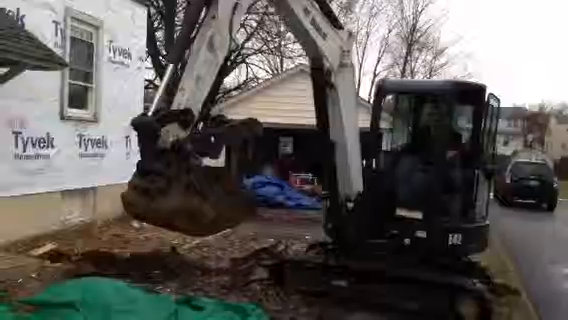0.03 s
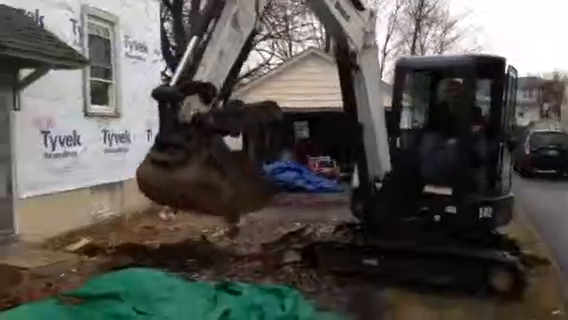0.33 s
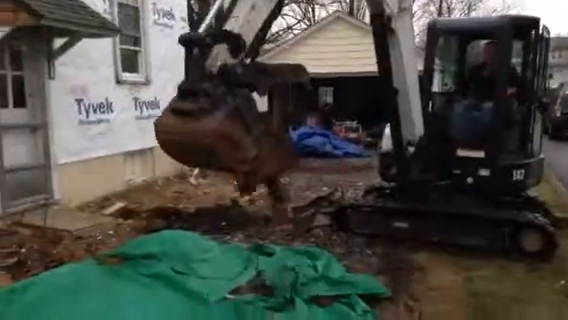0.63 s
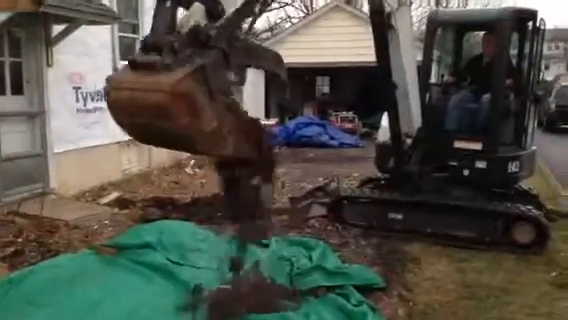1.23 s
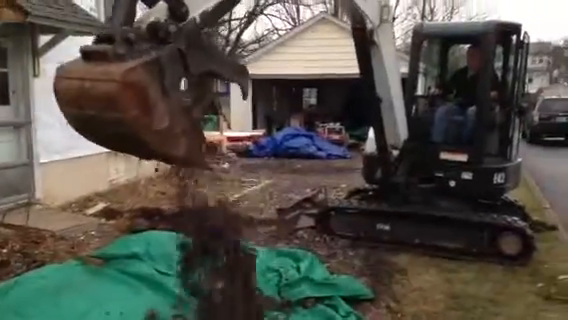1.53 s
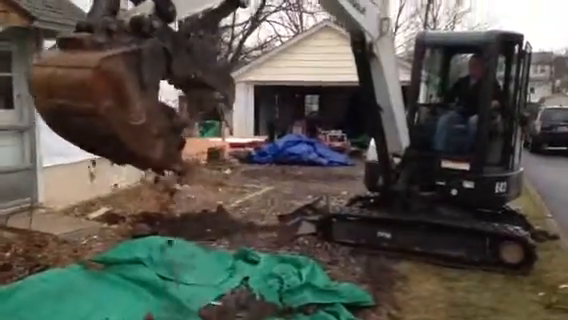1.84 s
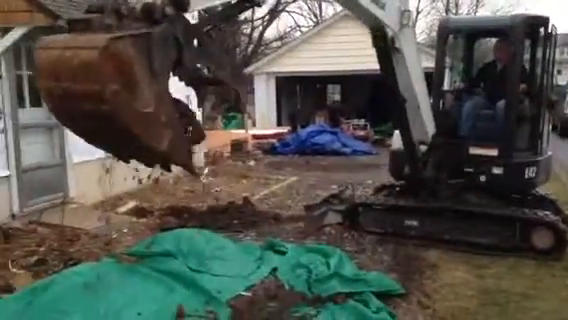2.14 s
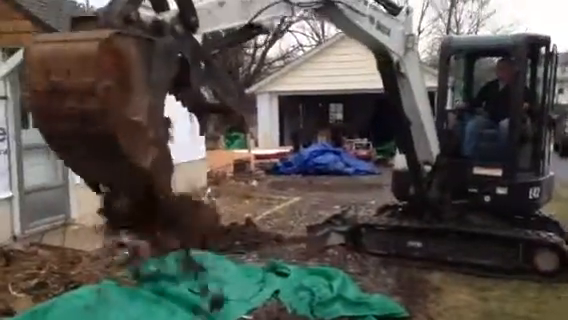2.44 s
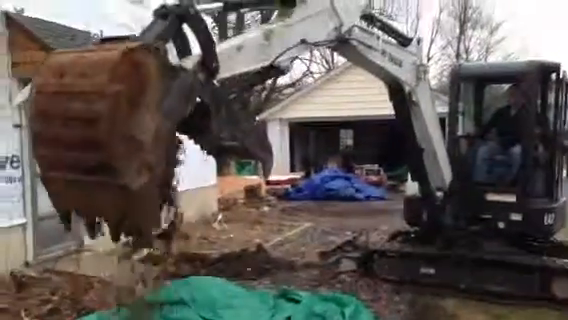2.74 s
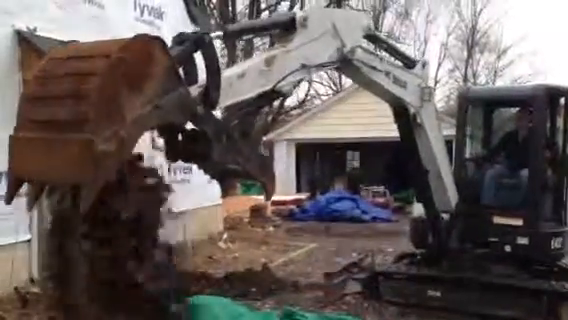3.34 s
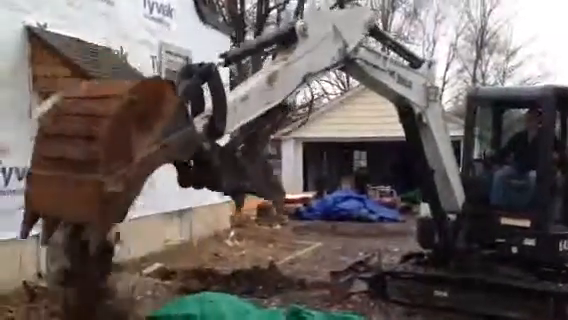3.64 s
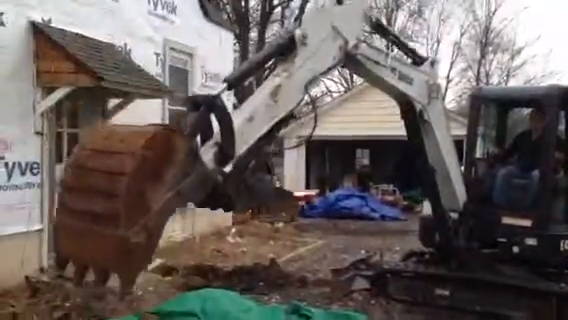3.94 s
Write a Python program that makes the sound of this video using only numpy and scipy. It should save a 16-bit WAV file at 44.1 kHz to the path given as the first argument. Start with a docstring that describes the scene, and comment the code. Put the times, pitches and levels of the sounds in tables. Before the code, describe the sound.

Soil falls in uneven waves onto a tarp and the ground, with clods thudding, stones knocking and plastic snapping. An excavator's diesel engine drones before and throughout the pour, heard in mono outdoors with a faint, short echo.

```python
"""A low diesel drone runs under surges of pattering soil, with thuds, knocks and sharp plastic snaps. A small
excavator is tipping a bucket of damp soil onto a tarp and the ground beside a house. Periodic firing makes the
exhaust tones, which sag in pitch under load. The soil is a sum of many tiny damped impacts; clods thud and
crumble, stones knock, and sharp snaps ring out as the tarp is struck or hard lumps crack. Reflections in the
yard add a faint, short tail, and one mono microphone picks it all up."""
import sys
import numpy as np
from scipy import signal
from scipy.fft import rfft, irfft
from scipy.io import wavfile

SR = 44100
rng = np.random.default_rng(int(sys.argv[2]) if len(sys.argv) > 2 else 0)


def store_pcm(level_fs):
    """Save levels as 16-bit WAV."""
    pcm = np.round(np.clip(level_fs, -1, 1) * 32767).astype(np.int16)
    wavfile.write(sys.argv[1], SR, np.atleast_2d(pcm).T)


N = 176400
T = np.arange(N) / SR


def amp(db):
    """Amplitude ratio of a level in decibels."""
    return 10 ** (np.asarray(db) / 20)


def unit(x):
    """Normalisation to an rms of 1."""
    return x / np.sqrt(np.mean(x ** 2) + 1e-20)


def curve(table, column=1):
    """Linear interpolation of one table column over time."""
    rows = np.array(table)
    return np.interp(T, rows[:, 0], rows[:, column])


def add(mix, start_s, sound):
    """Superposition: a sound joins the mix at its start time."""
    part = mix[round(start_s * SR):][:len(sound)]
    part += sound[:len(part)]


def drift(rate_hz):
    """Slow random fluctuation: low-passed noise of rms 1."""
    hz = np.fft.rfftfreq(N, 1 / SR)
    return unit(irfft(rfft(rng.standard_normal(N)) / (1 + (hz / rate_hz) ** 4), N))


def colour(x, spectrum, size=4096):
    """Minimum-phase filtering to a spectral shape, with unit power gain for white noise."""
    hz, db = np.transpose(spectrum)
    log_hz = np.log(np.fft.rfftfreq(size, 1 / SR) + 1)
    log_gain = np.log(amp(np.interp(log_hz, np.log(hz), db)))
    cepstrum = irfft(log_gain)[:size // 2]
    cepstrum[1:] *= 2
    taps = irfft(np.exp(rfft(cepstrum, size)))
    return signal.oaconvolve(x, taps / np.linalg.norm(taps))[:len(x)]


def knock(hz, decay_cycles, size=3000):
    """Heavily damped oscillation that builds quickly and dies, with a peak of 1."""
    cycles = hz * np.arange(size) / SR
    wave = cycles * np.exp(-cycles / decay_cycles) * np.sin(2 * np.pi * cycles)
    return wave / abs(wave).max()


def burst(decay_s, spread_db, size=4000):
    """Exponentially decaying noise, made grainy by a random gain on each sample."""
    t = np.arange(size) / SR
    grains = unit(rng.standard_normal(size) * amp(spread_db * rng.standard_normal(size)))
    return grains * (1 - np.exp(-t / 0.00046)) * np.exp(-t / decay_s)


def patter(per_s, spread_db, low_hz, high_hz, decay_cycles, pitches=9):
    """Shot noise: tiny knocks of random size and pitch arrive independently; rms 1."""
    hits = (rng.random(N) < per_s / SR) * rng.choice([-1, 1], N)
    hits = hits * amp(spread_db * np.minimum(rng.exponential(1, N), 3.2))
    pitch_index, out = rng.integers(0, pitches, N), np.zeros(N)
    for k, hz in enumerate(np.geomspace(low_hz, high_hz, pitches)):
        grain = knock(hz, decay_cycles)
        out += signal.oaconvolve(hits * (pitch_index == k), grain / abs(rfft(grain)).max())[:N]
    return unit(out)


def yard(x, tail_db=-15.5, t60_s=0.24, reflections_per_s=2000, size=12000):
    """Reverberation: sparse, decaying reflections follow the direct sound."""
    t = np.arange(size) / SR
    taps = rng.standard_normal(size) * (rng.random(size) < reflections_per_s / SR)
    taps *= (t > 0.004) * amp(-60 * t / t60_s)
    taps *= amp(tail_db) / np.linalg.norm(taps)
    taps[0] = 1  # direct path
    return signal.oaconvolve(x, taps)[:N]


def hollow(x, width_hz=290):
    """Notch filtering: subtracting a narrow band leaves a drifting hollow in the upper mids."""
    # path of the notch: time_s, centre_hz, depth_fraction
    notch = [(.6, 2900, 0.7), (1.1, 3010, 0.9), (1.85, 2850, 0.4), (2.5, 2601, 0.25), (3.2, 2684, 0.68)]
    carrier = np.exp(2j * np.pi * np.cumsum(curve(notch)) / SR)
    pole = np.exp(-np.pi * width_hz / SR)
    band = 2 * (carrier * signal.lfilter([1 - pole], [1, -pole], x / carrier)).real
    return x - curve(notch, column=2) * band


def engine(shaft_db=-42.5, speed_db_per_hz=0.57):
    """Periodic firing gives exhaust tones at harmonics of the shaft rate and modulates the clatter."""
    # exhaust drone: time_s, firing_hz, firing_tone_db, uneven_firing_tone_db
    drone = [(0.14, 84.1, -29.5, -36.5), (0.33, 85.8, -28.5, -68), (0.5, 79.5, -31, -37.5),
             (0.65, 83.8, -33.5, -37), (1.0, 81, -30, -40), (1.65, 79.9, -29.5, -37), (2.2, 77.9, -25, -50),
             (2.6, 78.5, -30, -54), (2.68, 79.35, -28.5, -41.5), (2.9, 79.4, -30, -34.5),
             (3.17, 79.7, -29.5, -52), (3.5, 85.46, -32.5, -41), (3.82, 89.15, -30, -60),
             (3.88, 89, -36, -56), (3.96, 83.2, -34.5, -62)]
    # brief dips and bends of the firing tone: centre_s, half_width_s, gain_db, sag_hz
    dips = [(2.728, 0.025, 0, 28), (2.931, 0.011, -18, -2.5), (3.421, .015, -7, 3)]
    # upper exhaust tones: firing_rate_multiple, level_db
    orders = [(2, -54.5), (2.5, -56.5), (3, -64)]
    # spectrum of the clatter and fan: frequency_hz, relative_db
    clatter_spectrum = [(20, -17), (50, 0.5), (100, 4), (200, -5.5), (340, -2.5), (480, -8), (680, -10.5),
                        (900, -8), (1300, -14), (2000, -14), (2550, -17), (3200, -18), (5000, -23.5),
                        (8000, -31), (15000, -38.5)]
    # envelope of the clatter: time_s, level_db
    clatter_levels = [(.12, -36), (.28, -37), (.42, -41), (.5, -38.5), (2.2, -36), (3.8, -41), (3.9, -51)]
    firing_hz = curve(drone) * (1 + 0.0044 * drift(8.3))
    phase = 2 * np.pi * np.cumsum(firing_hz) / SR
    dip_db, sag_hz = sum(np.outer(depths, np.exp(-((T - centre_s) / half_width_s) ** 2))
                         for centre_s, half_width_s, *depths in dips)
    phase_lag = 2 * np.pi * np.cumsum(sag_hz) / SR
    tones = amp(curve(drone, column=2) + dip_db) * np.sin(phase - phase_lag)
    tones += amp(curve(drone, column=3)) * np.sin(1.5 * phase)  # uneven firing
    tones += amp(shaft_db + 0.6 * drift(5)) * np.sin(phase / 2)  # once per shaft turn
    speed_db = speed_db_per_hz * (firing_hz - firing_hz.mean())  # upper tones fade as the engine slows
    for multiple, level_db in orders:
        gain = amp(level_db + speed_db + 7 * drift(3.6))
        tones += gain * np.sin(multiple * phase + 2 * np.pi * rng.random())
    throb = amp(1.2 * np.cos(phase) + 1.1 * np.cos(phase / 2))
    clatter = colour(throb * rng.standard_normal(N), clatter_spectrum)
    return np.sqrt(2) * tones + amp(curve(clatter_levels)) * clatter


def cracks():
    """Impulsive excitation: short broadband snaps ring out, from the plastic sheet struck on a fold or from
    hard lumps cracking."""
    # sharp snaps: start_s, level_db
    snaps = [(.557, -37), (0.697, -19), (.739, -27.5), (.835, -29), (1.194, -18), (1.233, -14),
             (1.484, -14), (1.733, -19), (1.827, -15), (2.152, -20.5), (2.196, -20.5), (2.312, -15),
             (2.452, -21), (2.531, -19), (2.7293, -17), (2.74, -24), (2.772, -20), (2.806, -15),
             (2.836, -19), (2.957, -17), (3.347, -9)]
    # spectrum of a snap: frequency_hz, relative_db
    snap_spectrum = [(300, -19), (1500, -6), (3500, -2.5), (7000, -6), (15000, -17)]
    out = np.zeros(N)
    for start_s, level_db in snaps:
        add(out, start_s, amp(level_db) * burst(decay_s=0.0023, spread_db=2.5))
    return colour(out, snap_spectrum)


def stones(scuff_db=-7):
    """Damped impact and friction: each stone knocks once and scuffs the ground at the same pitch."""
    # stone landings: start_s, peak_db, pitch_hz
    landings = [(1.3, -10, 1986), (1.3293, -6.5, 1740), (1.6393, -7, 2250), (1.7972, -3.5, 2430),
                (2.3995, -11, 1290), (2.4305, -14, 1709), (2.453, -19, 1690), (2.7315, -4, 3300),
                (2.8054, -8, 2600), (2.9607, -8, 1970), (3.6374, -4.5, 1510), (3.842, -5.5, 4300)]
    out = np.zeros(N)
    for start_s, peak_db, pitch_hz in landings:
        hit = knock(pitch_hz, decay_cycles=0.355)
        scuff = signal.fftconvolve(burst(decay_s=0.0029, spread_db=9.5), hit / np.linalg.norm(hit))
        add(out, start_s, amp(peak_db) * hit)
        add(out, start_s, amp(peak_db + scuff_db) * scuff)
    return out


def clods(slump_db=-13, slump_cycles=4.6):
    """Inelastic impact: each clod thuds on the ground, slumps and fractures into crumbs."""
    # clod landings: start_s, thud_db, pitch_hz, crumble_db
    landings = [(1.04, -15.5, 286.4, -28), (1.094, -23, 330, -29), (1.2341, -11.5, 265, -38),
                (1.247, -26, 250, -39), (1.323, -38, 472, -17), (1.561, -49, 406.4, -16),
                (1.826, -22, 171, -18), (2.288, -36, 450, -22), (2.377, -42, 480, -25),
                (2.398, -39, 595, -21.5), (2.663, -22.5, 419, -37), (2.673, -51, 200.7, -21),
                (2.77, -42, 403, -16.5), (2.855, -18, 151, -13.5), (2.863, -12, 486, -11),
                (2.896, -22, 258, -20), (3.2629, -18, 380, -12.5), (3.285, -25, 392, -16.5),
                (3.3252, -10.5, 163, -13), (3.349, -41, 168, -20.5), (3.377, -29, 130.9, -20.5),
                (3.62, -44, 300, -35)]
    # spectrum of a clod breaking up: frequency_hz, relative_db
    crunch_spectrum = [(150, -6.5), (500, -1.5), (950, -2.5), (1400, -6), (2100, 4.5), (4000, -4.5),
                       (7000, -20.5), (15000, -30)]
    thuds, crumbs = np.zeros(N), np.zeros(N)
    for start_s, thud_db, pitch_hz, crumble_db in landings:
        soft_knock = knock(pitch_hz, decay_cycles=0.32)
        collapse = burst(decay_s=slump_cycles / pitch_hz, spread_db=-3.5)  # longer for a deeper thud
        slump = signal.fftconvolve(collapse, soft_knock / np.linalg.norm(soft_knock))
        add(thuds, start_s, amp(thud_db) * knock(pitch_hz, decay_cycles=0.45))
        add(thuds, start_s, amp(thud_db + slump_db) * slump)
        add(crumbs, start_s, amp(crumble_db) * burst(decay_s=0.011, spread_db=3.5))
    return thuds + colour(crumbs, crunch_spectrum)


def crackle(per_s=90):
    """An irregular impulse train: sharp grains strike the tarp one by one."""
    # spectrum of one grain on the tarp: frequency_hz, relative_db
    grain_spectrum = [(400, -23), (1200, 0), (2300, 2.5), (4500, -3), (7000, -7.5), (15000, -23)]
    gaps_s = rng.uniform(0.2, 1.8, int(2 * per_s * N / SR)) / per_s
    onsets = (np.cumsum(gaps_s) * SR).astype(int)
    onsets = onsets[onsets < N]
    hits = np.zeros(N)
    hits[onsets] = rng.choice([-1, 1], len(onsets)) * amp(rng.uniform(-12, 0, len(onsets)))
    return unit(colour(hits, grain_spectrum))


def soil(pebble_db=-15, dust_db=-2.5, crackle_db=-2, rise_s=0.051):
    """Granular impact noise: countless landings add in power, and finer grains sound higher."""
    # surges of the pour, before each size's offset: time_s, crumbs_db, grit_db, lumps_db
    pour = [(0.55, -74, -56, -39), (0.66, -39, -50, -42), (0.71, -72, -40.5, -35), (0.76, -43, -38, -34),
            (0.8, -43.5, -43, -38.5), (0.93, -38.5, -46, -54), (1.0, -23.5, -31.5, -30.5),
            (1.05, -25, -27.5, -24), (1.16, -30.5, -30.5, -31), (1.22, -26.5, -31, -35),
            (1.26, -31, -33.5, -25.5), (1.31, -24, -30.5, -29.5), (1.36, -24.5, -33.5, -31),
            (1.44, -28, -37, -35.5), (1.5, -22.5, -30, -31), (1.58, -23, -28.5, -36.5),
            (1.7, -27, -28, -36), (1.75, -22, -26, -32.5), (1.82, -26, -26.5, -29.5),
            (1.88, -27, -29.5, -36.1), (1.99, -32.5, -38.5, -36), (2.1, -31.5, -42, -40.5),
            (2.17, -30, -34.5, -39), (2.24, -30.5, -37, -40), (2.3, -25, -32.5, -33),
            (2.36, -26.5, -42, -39), (2.42, -27.5, -38, -39), (2.44, -23, -38, -39), (2.5, -27, -36, -33.5),
            (2.56, -29, -36.5, -41), (2.64, -26, -41, -47), (2.71, -26.5, -38, -50), (2.735, -22, -26, -57),
            (2.76, -22.5, -36, -50), (2.8, -19.5, -27.5, -34), (2.85, -15.5, -21.5, -23),
            (2.89, -22.5, -29, -28.5), (2.96, -25.5, -31.5, -38), (3.08, -30.5, -37.5, -40),
            (3.14, -31.5, -35, -42), (3.21, -30, -28, -32), (3.25, -27, -36, -55), (3.31, -26.5, -29, -49),
            (3.36, -29, -25, -51), (3.41, -41, -38.5, -46), (3.46, -35, -34, -40), (3.52, -41, -44.5, -44),
            (3.58, -33, -39.5, -38.5), (3.63, -32, -31, -27), (3.69, -33, -38, -33.5),
            (3.76, -31, -32.5, -33), (3.83, -32, -32, -35), (3.87, -37.5, -48, -53),
            (3.99, -42.5, -48, -46)]
    # share of the soil that lands on the tarp: time_s, share_fraction
    tarp_shares = [(1.0, 0.6), (1.35, 0.84), (1.6, 0.72), (1.85, 0.57), (2.1, 0.34), (2.6, 0.14),
                   (2.85, 0.3), (3.1, 0.06), (3.8, 0.33)]
    # spectrum of crumbs on the ground: frequency_hz, relative_db
    crumb_spectrum = [(200, -27), (550, -6.5), (950, -4.5), (1500, 5.5), (2100, 4), (3000, -2.5),
                      (3900, -10), (4600, -11.5), (7000, -13), (15000, -32)]
    # spectrum of crumbs on the tarp: frequency_hz, relative_db
    rattle_spectrum = [(200, -28.5), (700, -8.5), (1150, 5), (1650, -2.5), (2300, 2.5), (3100, -1),
                       (4000, -3), (4600, -13), (7000, -17), (15000, -55)]
    # spectrum of grit: frequency_hz, relative_db
    grit_spectrum = [(500, -10), (2000, 10.5), (3500, 6), (5000, 3), (7000, -5.5), (10000, -6),
                     (15000, -12)]
    # hiss of the finest soil: frequency_hz, relative_db
    dust_spectrum = [(1000, -5), (4000, 5), (8000, 0.5), (11000, -3.5), (15000, -7)]
    # spectrum of soft lumps: frequency_hz, relative_db
    lump_spectrum = [(40, 5.5), (110, -4.5), (200, -3), (350, -1.5), (600, -4), (1000, -11), (2500, -17.5)]
    clumping, share = drift(28), curve(tarp_shares)

    ground_hits = patter(per_s=2600, spread_db=0.5, low_hz=609, high_hz=9100, decay_cycles=0.66)
    tarp_hits = patter(per_s=2200, spread_db=-2.5, low_hz=617, high_hz=8800, decay_cycles=0.4)
    pebbles = patter(per_s=70, spread_db=3, low_hz=1480, high_hz=4060, decay_cycles=0.45)
    crumbs = np.sqrt(1 - share) * unit(colour(ground_hits, crumb_spectrum))
    crumbs += np.sqrt(share) * unit(colour(tarp_hits, rattle_spectrum))
    crumbs += amp(pebble_db) * pebbles

    grit_hits = patter(per_s=6000, spread_db=6, low_hz=1480, high_hz=14500, decay_cycles=0.38)
    grit = unit(colour(grit_hits, grit_spectrum))
    grit += amp(dust_db) * colour(rng.standard_normal(N), dust_spectrum)
    grit += amp(crackle_db) * np.sqrt(share) * crackle()

    lump_hits = patter(per_s=700, spread_db=0, low_hz=92.6, high_hz=1220, decay_cycles=0.51)
    lumps = unit(colour(lump_hits, lump_spectrum))

    out = crumbs * amp(curve(pour) - 0.5 + 1.12 * clumping)
    out += grit * amp(curve(pour, column=2) - 0.5 + 1.5 * clumping)
    out += lumps * amp(curve(pour, column=3) - 1.15 + 0.61 * clumping)
    start_s = pour[0][0]
    return out * np.clip((T - start_s) / rise_s, 0, 1)


def scene():
    """Superposition of the engine and the reverberant pour, the same in both channels."""
    mono = hollow(engine() + yard(soil() + clods() + stones() + cracks()))
    return np.array([mono, mono])


def record(dry, start_s=0.119, ceiling=0.8, cutoff_hz=15500):
    """Transduction: the microphone opens after a moment, with bass roll-off, saturation and a band limit."""
    # microphone response: frequency_hz, relative_db
    response = [(15, -14), (36, 0), (16000, 0)]
    opened = dry * np.clip((T - start_s) / 0.002, 0, 1)
    coloured = np.array([colour(channel, response) for channel in opened])
    saturated = coloured / (1 + (coloured / ceiling) ** 4) ** 0.25
    lowpass_taps = signal.firwin(511, cutoff_hz, window=("kaiser", 9), fs=SR)
    return signal.oaconvolve(saturated, lowpass_taps[None], "same")


dry = scene()
out = record(dry)
store_pcm(out)
```